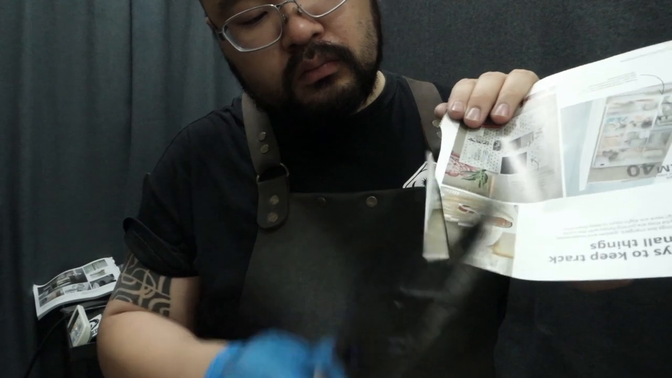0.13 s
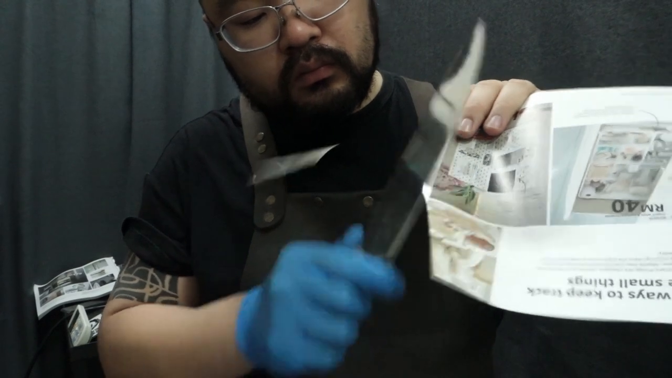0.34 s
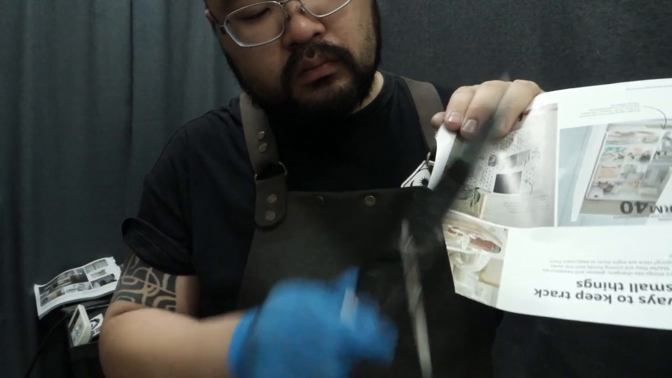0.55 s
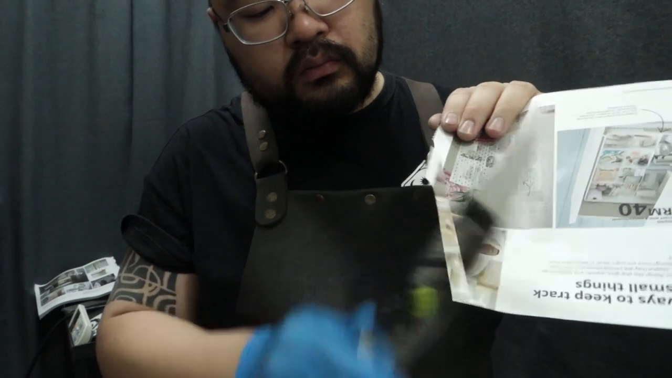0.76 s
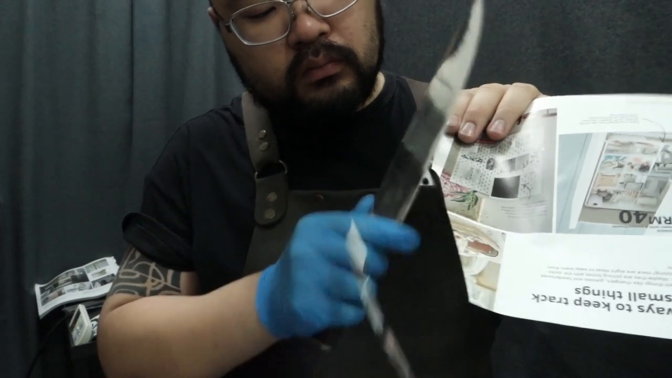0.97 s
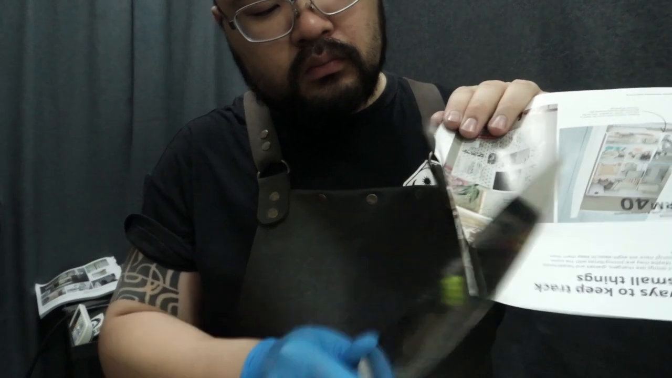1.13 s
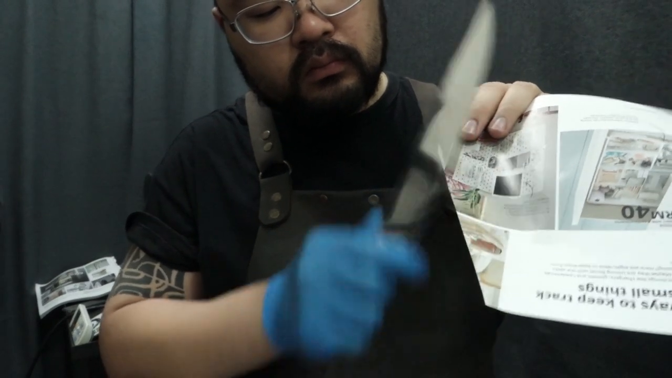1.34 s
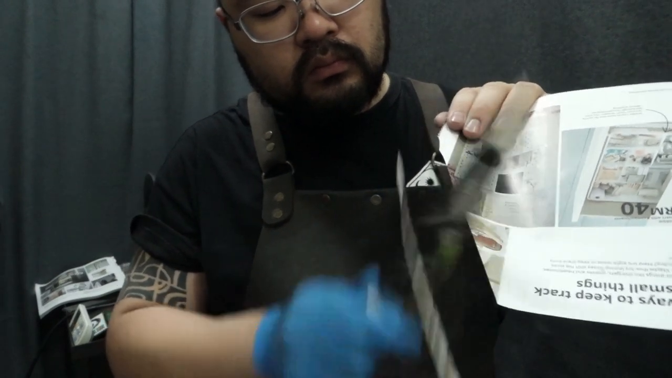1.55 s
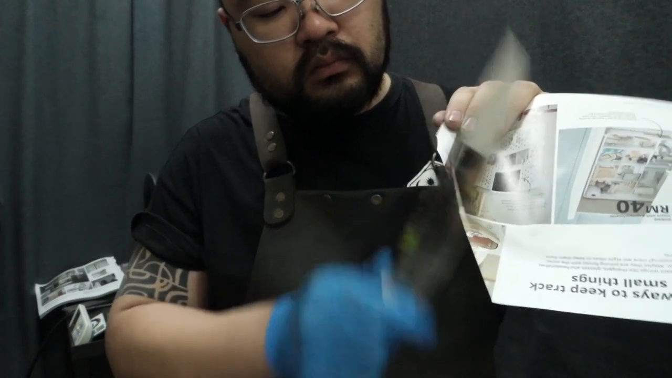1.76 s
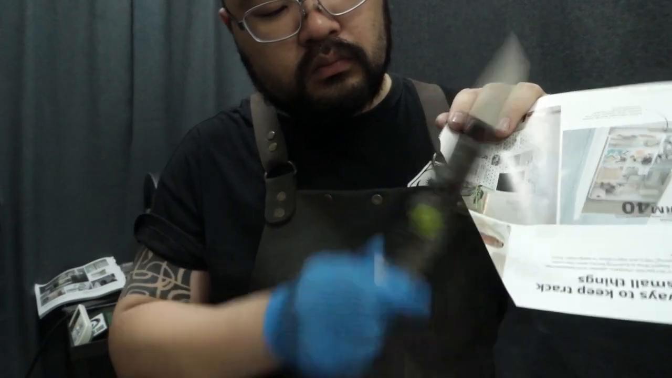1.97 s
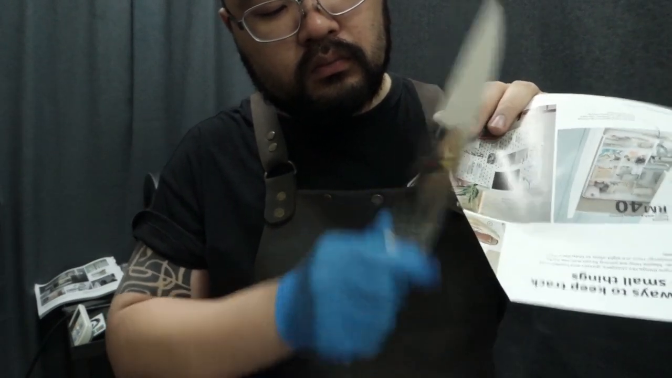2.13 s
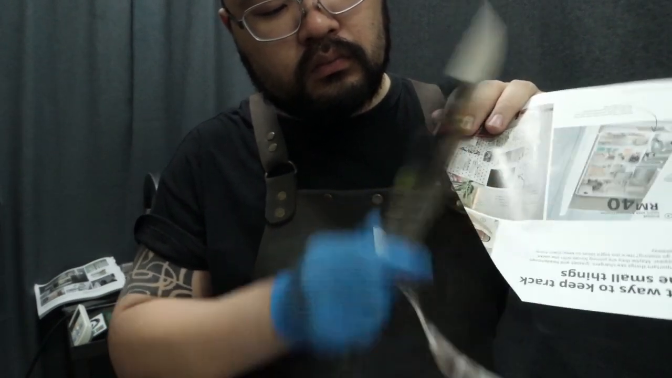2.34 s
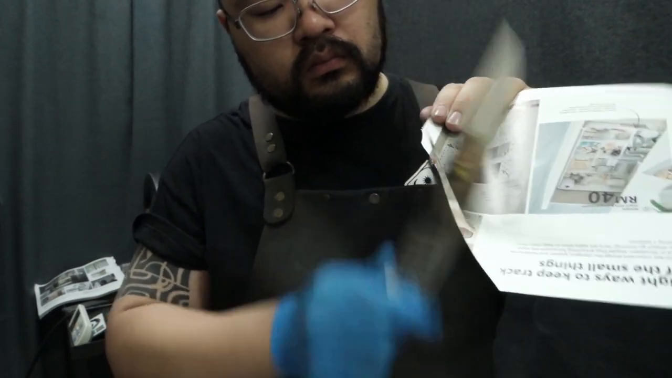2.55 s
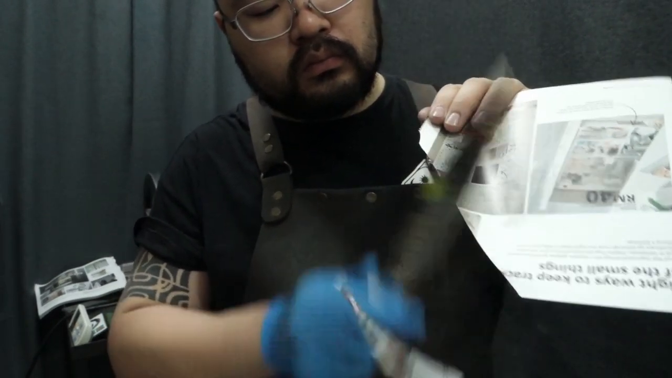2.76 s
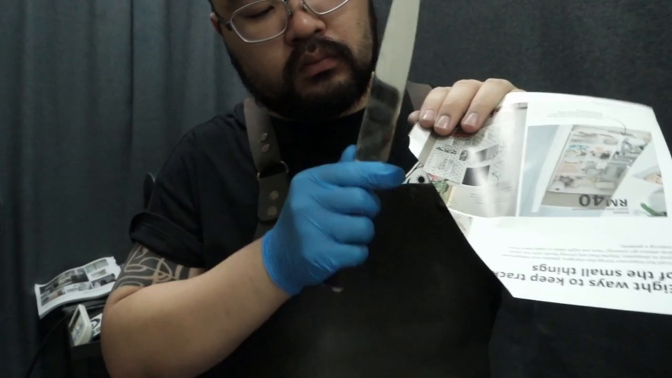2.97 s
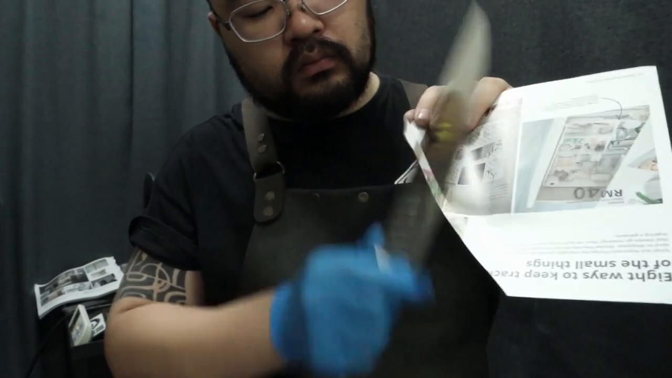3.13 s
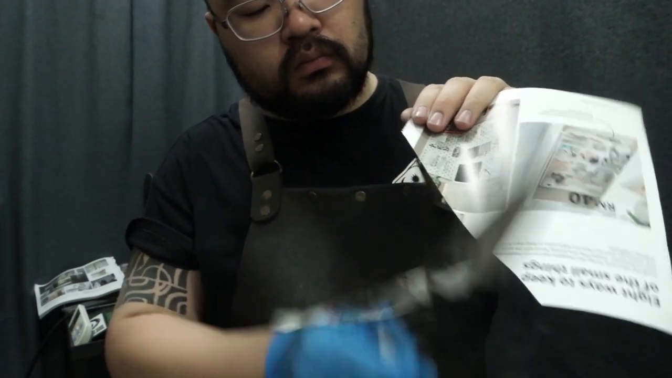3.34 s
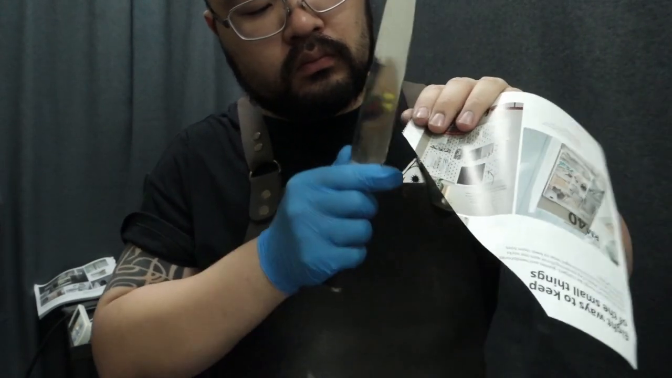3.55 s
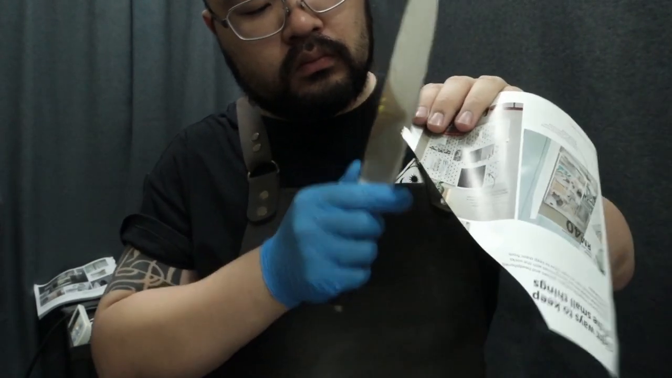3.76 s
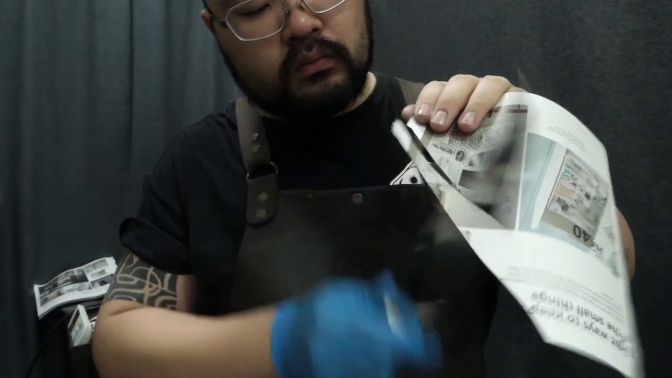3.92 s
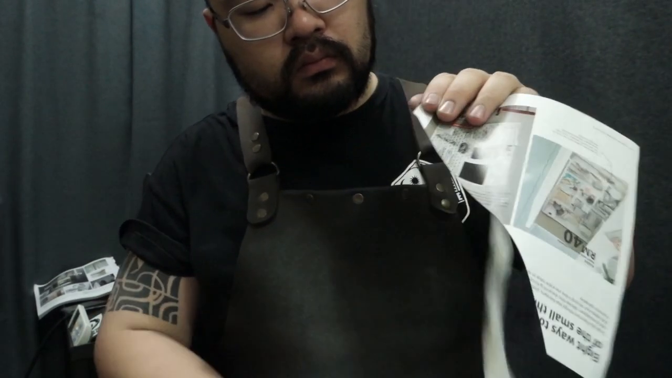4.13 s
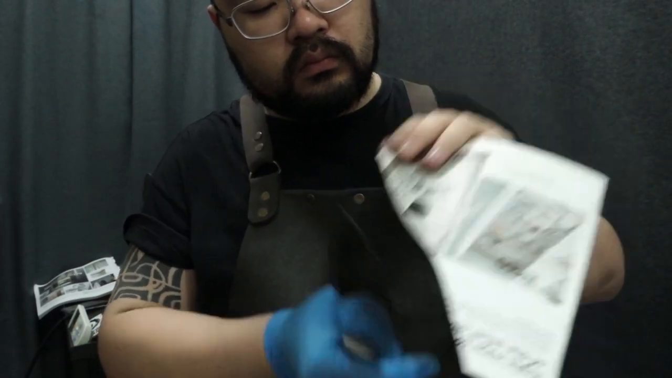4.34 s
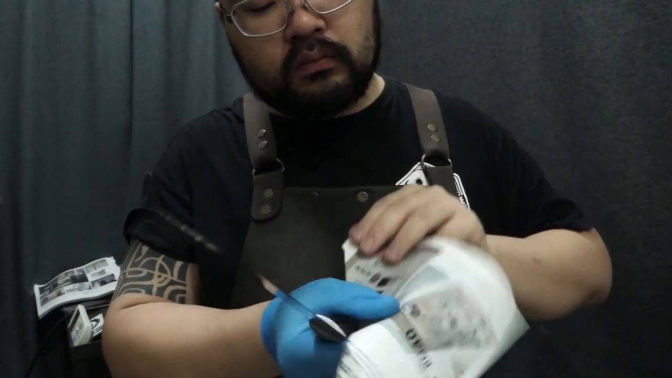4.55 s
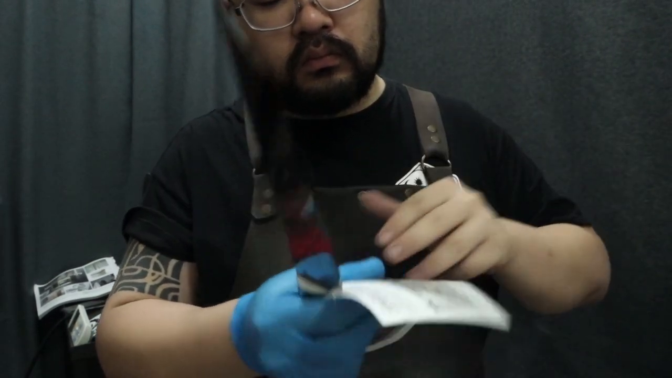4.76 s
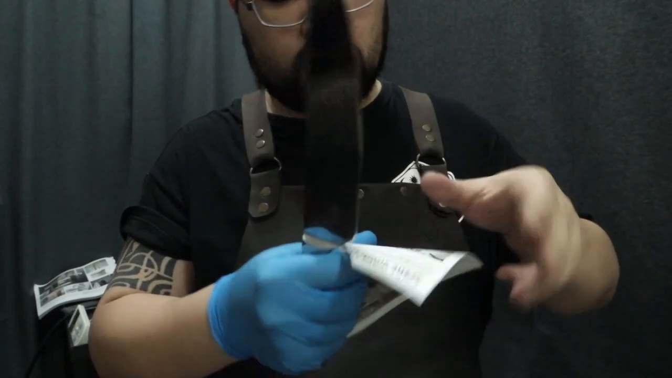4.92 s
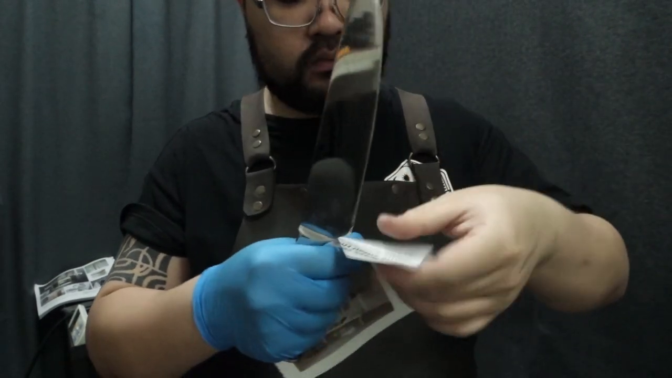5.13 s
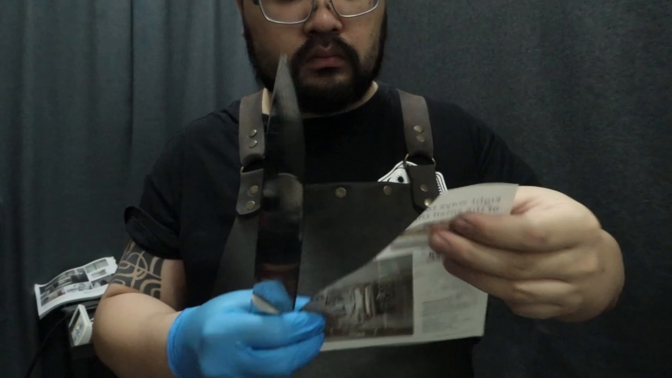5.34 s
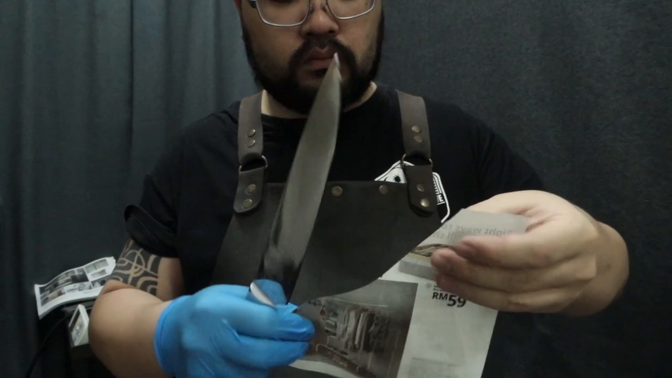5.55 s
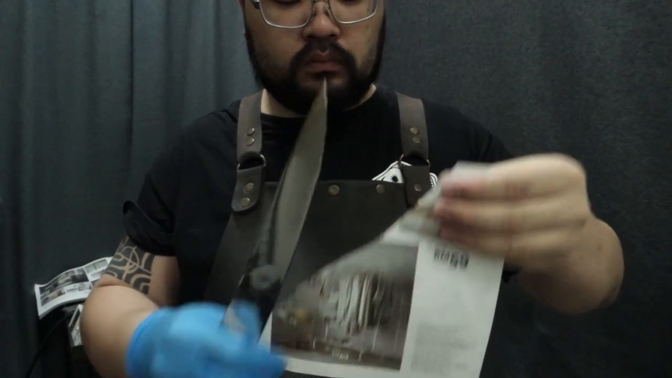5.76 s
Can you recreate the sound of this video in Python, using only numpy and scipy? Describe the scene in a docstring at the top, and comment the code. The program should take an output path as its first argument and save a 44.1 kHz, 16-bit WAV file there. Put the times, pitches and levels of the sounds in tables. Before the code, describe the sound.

A close stereo pickup in a small, fairly dry workshop with a quiet, hollow ventilation rush. A sharp knife slices newsprint off to the right. Eight quick cuts come at about 0.07, 0.38, 0.7, 1.0, 1.4, 1.75, 2.1 and 2.5 seconds, each a crisp zip of roughly a tenth of a second: dense snapping fibres, a papery midrange ring, bright fizz and a gliding rasp. A longer cut follows at 3.06, and the longest, a strong ripping swish of over a quarter second, at 3.75. Small pops of buckling paper occur near some strokes, with a faint rustle around 3.35. From 4.1 the sheet is handled and moves toward the middle: sparse crackles, soft low air puffs, and sharp flapping pops around 4.5 to 4.65 and 4.86. More rustling runs from 5.15 to 5.85, with duller pops near 5.4 and 5.7, then mostly room air.

```python
"""Ten quick slices of a sharp knife through newsprint are heard first, off to the right in a small workshop.
Each is a dense train of snapping fibres, shaped by the resonance of the sheet, with a rasp that may glide in pitch.
The sheet rustles (slipping creases) and pops (dispersive buckling), mostly as the hands turn it after the cuts.
Behind it lie soft puffs of air, diffuse echoes, and the low rush of ventilation made from filtered noise.
"""
import sys
import numpy as np
from scipy import signal
from scipy.fft import rfft, irfft
from scipy.io import wavfile
from scipy.ndimage import uniform_filter1d

SR = 44100
rng = np.random.default_rng(int(sys.argv[2]) if len(sys.argv) > 2 else 0)


def generate_wav(sig):
    """Save sig (samples, or channels by samples) to the path in sys.argv[1] as 16-bit PCM at SR."""
    pcm = np.round(np.clip(np.atleast_2d(sig).T, -1, 1) * 32767).astype(np.int16)
    wavfile.write(sys.argv[1], SR, pcm)


N = 259749
TIME = np.arange(N) / SR  # s

# Knife strokes; levels precede the trims in cuts(). Columns: [start t/s, end t/s, crest/share of stroke,
#   swell up to crest/dB, easing after it/dB, sheet level/dB, fizz over sheet/dB, flutter over sheet/dB,
#   sheet ring f/Hz, first belly rasp f/Hz, last belly rasp f/Hz, tip rasp level/dB]
STROKES = [(0.068, 0.151, 0.52, 12, 3, -28, -0.5, -9, 2200, 8600, 8800, -37),
           (0.381, 0.474, 0.68, 7, 4.5, -26.5, 0, -9.5, 2010, 4330, 5560, -38),
           (0.694, 0.817, 0.42, 4.5, 4.5, -28.5, 0.5, -7, 2050, 8200, 9800, -44),
           (1.023, 1.146, 0.41, 9, 3.5, -29, 1.5, -7.5, 2130, 8700, 7150, -49),
           (1.364, 1.49, 0.73, 1.5, 5, -30, 2, -7.5, 2100, 9500, 4300, -54),
           (1.745, 1.853, 0.51, 3, 1, -30.5, 2, -7, 2400, 7400, 4230, -62),
           (2.124, 2.245, 0.32, 6.5, 2.5, -31.5, 3.5, -6.5, 2320, 7460, 4400, -34.5),
           (2.52, 2.648, 0.4, 3.5, 3.5, -31.5, 5, -7, 2320, 8300, 5800, -30.5),
           (3.057, 3.236, 0.38, 5.5, 9, -27.5, 2, -11, 2260, 6900, 6900, -28.5),
           (3.748, 4.015, 0.47, 9, 4, -24, -1, -12, 2600, 5600, 6700, -28)]
# Bends of the sheet in the hands; levels precede the trims in rustles().
# Columns: [start t/s, length t/s, sheet level/dB, fizz over sheet/dB, ring f/Hz]
BENDS = [(3.333, 0.11, -57, 9, 2200), (4.095, 0.16, -57, 5, 2600), (4.255, 0.065, -47, 12.5, 2600),
         (4.318, 0.18, -58, 2, 2600), (4.495, 0.2, -44, -4.5, 2490), (4.664, 0.079, -44, -7.5, 2580),
         (4.726, 0.17, -50, -3.5, 2450), (4.865, 0.064, -40, -20, 2420), (5.146, 0.091, -37, -9.5, 2030),
         (5.225, 0.14, -46, -6.5, 1970), (5.355, 0.11, -45.5, -7, 2180), (5.476, 0.3, -54, -5.5, 2100),
         (5.627, 0.097, -55, -5.5, 2000), (5.712, 0.15, -46.5, -4, 1910)]
# Buckles of the sheet; levels precede the trims in pops().
# Columns: [t/s, peak level/dB, treble over it/dB, ring f/Hz]
BUCKLES = [(.688, -25.5, -13, 2280), (.912, -45.5, 15, 2400), (2.513, -31, -1, 2300),
           (3.052, -19, -6, 2220), (3.339, -36, 9.5, 2070), (3.397, -32.5, 1.5, 2280),
           (4.158, -34, -9, 2770), (4.258, -26.5, 7, 1490), (4.515, -20.5, -5, 2270),
           (4.549, -16, -11, 2280), (4.646, -21.5, -6.5, 2700), (4.859, -15.5, -2, 2300),
           (5.412, -20.5, -15, 2100), (5.449, -27.5, -20, 2030), (5.718, -27.5, -14, 1500)]
# Flaps of the whole sheet that push air at the microphone. Columns: [t/s, level/dB]
AIR_PUFFS = [(4.255, -63), (4.5, -71), (4.635, -67)]
# Relative spectrum of snapping fibres. Columns: [f/Hz, level/dB]
CUT_SPECTRUM = [(180, -36), (300, -32.5), (406, -23.5), (657, -20.5), (875, -19.5), (1200, -10.5),
                (1530, -8), (2130, 1), (2790, 1.5), (3290, -4), (4130, -8), (5580, -0.5), (8020, -4.5),
                (10200, -6.5), (11000, -5), (14300, -77), (22000, -120)]
# Relative spectrum of slipping creases. Columns: [f/Hz, level/dB]
CREASE_SPECTRUM = [(290, -58), (500, -15), (665, -8.5), (1100, -10), (2490, -12), (4170, -18), (6230, -12),
                   (9920, -11.5), (11000, -12.5), (14300, -51), (22000, -120)]
# Relative spectrum of the ventilation. Columns: [f/Hz, level/dB]
AIR_SPECTRUM = [(15, -75.5), (25, -72), (110, -28), (247, -9.5), (603, -3.5), (721, -6.5), (862, -5.5),
                (1330, -9), (1510, -12.5), (1670, -8.5), (2000, -10.5), (2160, -8), (2450, -12),
                (3000, -23.5), (11000, -26), (14300, -76), (22000, -120)]
# Paper fully to the side, at the two microphone ports. Columns: [f/Hz, left minus right level/dB]
PAPER_BALANCE = [(500, -3), (1500, -4.5), (2700, -2.5), (3300, -7), (4300, -12), (5500, -6), (7500, -11),
                 (11000, -8.5)]
# Phase of the same. Columns: [f/Hz, lead of left port/rad]
PAPER_PHASE = [(100, 0), (2000, -0.2), (3000, -0.8), (4100, -2.3), (4300, 2.5), (4800, 0.5), (6000, -0.8),
               (11000, -1.9)]
# Sound from all round at the ports. Columns: [f/Hz, left minus right level/dB]
ROOM_BALANCE = [(600, 0.5), (2300, 0), (3300, -6), (4400, -9), (5500, -4), (11000, -6)]
# Reverberation time of the workshop. Columns: [f/Hz, t60/s]
ROOM_DECAY = [(300, 0.72), (1200, 0.24), (2500, 0.27), (5500, 0.29), (11000, 0.24)]

# every stroke swells to a crest and eases off; the fizz eases less than the sheet
SWELL_CURVE, STROKE_RAMP_S, FIZZ_EASE_SHARE = 1.38, 0.0029, 0.45
# the sheet falls quiet over this time once the edge has left it or the hand has stopped
RELEASE_S = 0.013
# the loose strip flutters most a little past the middle of the stroke
FLUTTER_CREST, FLUTTER_EASE_DB = 0.59, 8
# the belly of the blade rasps in the first half of the stroke, the tip near its end: (from, to) shares
BELLY_SHARES, BELLY_OVER_FIZZ_DB = (0.092, 0.508), -6  # dB over the tabulated fizz
TIP_SHARES, TIP_FIRST_HZ, TIP_LAST_HZ = (0.75, 0.93), 10940, 8800
# a move of the sheet builds quickly and dies away
RUSTLE_CREST, RUSTLE_SWELL_DB, RUSTLE_EASE_DB, RUSTLE_RAMP_S = 0.29, 2.5, 9, 0.0035
# after the last cut the hands bring the sheet towards the middle
TURN_START_S, TURN_LENGTH_S = 4.33, 0.13
AIR_DB = -52.5  # rush, before it is made diffuse
EDGE_HZ = 11080  # upper band limit


def cuts(sheet_db=0.5, fizz_db=-2.0, flutter_db=0.0, bite_db=-34, bite_s=0.00094):
    """Impulsive fracture: snapping fibres fizz at the edge, ring in the sheet and shake the loose strip."""
    out = np.zeros(N)
    clicks = snaps(N, per_s=6000, spread_db=1.7, clump_db=0.96, clumps_per_s=250)
    fibres = colour(patchy(clicks), CUT_SPECTRUM)
    for start, end, crest, swell_db, ease_db, db, over_db, strip_db, ring_hz, *_ in STROKES:
        tear = fibres[round(start * SR):round((end + RELEASE_S / 2) * SR)]
        n = len(tear)
        sheet_swell = swell(n, crest, swell_db, ease_db, STROKE_RAMP_S)
        fizz_swell = swell(n, crest, swell_db, FIZZ_EASE_SHARE * ease_db, STROKE_RAMP_S)
        flutter_swell = swell(n, FLUTTER_CREST, swell_db, FLUTTER_EASE_DB, STROKE_RAMP_S)
        # the edge bites into the rim of the sheet with a burst of fizz
        bite = from_db(bite_db) * np.exp(-TIME[:n] / bite_s)
        fizz_gain = from_db(db + over_db + fizz_db) * fizz_swell + bite

        sheet = from_db(db + sheet_db) * sheet_swell * sheet_body(tear, ring_hz, lo_hz=1470, width_hz=1280)
        fizz = fizz_gain * unit(band(tear, 3240, 11500))
        flutter = from_db(db + strip_db + flutter_db) * flutter_swell * unit(band(tear, 317, 1420))
        add(out, start, sheet + fizz + flutter)
    return out


def rasps():
    """Resonant noise, twice a stroke: a rasp along the belly of the blade, then one at the tip."""
    out = np.zeros(N)
    for start, end, _, _, _, db, over_db, _, _, first_hz, last_hz, tip_db in STROKES:
        belly_db = db + over_db + BELLY_OVER_FIZZ_DB
        add(out, *rasp(start, end, BELLY_SHARES, first_hz, last_hz, belly_db))
        add(out, *rasp(start, end, TIP_SHARES, TIP_FIRST_HZ, TIP_LAST_HZ, tip_db))
    return out


def rasp(start, end, shares, first_hz, last_hz, db, width_hz=1500, fade_share=0.3):
    """Resonant noise: randomly timed, clumped fibre snaps ring round one pitch, which may glide."""
    begin, stop = start + (end - start) * np.array(shares)
    length = max(round((stop - begin) * SR), 64)
    hz = np.geomspace(first_hz, last_hz, length)
    drive = snaps(length, per_s=7000, spread_db=1.5, clump_db=2, clumps_per_s=300)
    tone = unit(resonate(resonate(drive, hz, width_hz), hz, width_hz))
    return begin, from_db(db) * tone * signal.windows.tukey(length, fade_share)


def rustles(sheet_db=-3, fizz_db=-3):
    """Stick-slip: creases slip as the sheet bends, giving sparser and duller clicks than a cut."""
    out = np.zeros(N)
    clicks = snaps(N, per_s=1500, spread_db=2.5, clump_db=3.5, clumps_per_s=170)
    creases = colour(patchy(clicks), CREASE_SPECTRUM)
    for start, length, db, over_db, ring_hz in BENDS:
        crackle = creases[round(start * SR):][:round(length * SR)]
        sheet = from_db(sheet_db) * sheet_body(crackle, ring_hz, lo_hz=590, width_hz=1970)
        fizz = from_db(fizz_db + over_db) * unit(band(crackle, 4900, 11400))
        move = swell(len(crackle), RUSTLE_CREST, RUSTLE_SWELL_DB, RUSTLE_EASE_DB, RUSTLE_RAMP_S)
        add(out, start, from_db(db) * (sheet + fizz) * move)
    return out


def pops(ring_width_hz=1400, fall_s=0.0018, crackle=0.19, level_db=-2.0, tick_db=-2.0, thud_db=-16):
    """Snap-through buckling: one snap with a dense, quickly dying crackle runs across the sheet and rings it."""
    out, t = np.zeros(N), np.arange(1024) / SR
    for s, db, treble_db, hz in BUCKLES:
        dying_crackle = crackle * rng.standard_normal(len(t)) * np.exp(-t / fall_s)
        flip = bend_wave((t == 0) + dying_crackle, travel_s=0.00204)
        ring = resonate(band(flip, 1070, 2940, order=4), hz, ring_width_hz)
        tick = band(flip, 4150, 8800, order=2)
        thud = band(flip, 320, 1570, order=2)
        parts = [(ring, 0), (tick, treble_db + tick_db), (thud, thud_db)]
        pop = sum(from_db(part_db) * x / abs(x).max() for x, part_db in parts)
        add(out, s, from_db(db + level_db) * pop)
    return out


def snaps(length, per_s, spread_db, clump_db, clumps_per_s):
    """A random point process: fibres give way one by one, in clicks of uneven size that come in clumps."""
    size = from_db(spread_db * np.minimum(rng.exponential(1, length), 4))
    clicks = size * rng.choice([-1, 1], length) * (rng.random(length) < per_s / SR)
    return unit(clicks * from_db(clump_db * wander(length, clumps_per_s)))


def sheet_body(x, ring_hz, lo_hz, width_hz):
    """Plate resonance: a broad ring whose pitch depends on how the sheet is held and curved."""
    return unit(resonate(band(x, lo_hz, 4095), ring_hz, width_hz))


def patchy(x, depth_db=2.5, order=3, size=16):
    """Shifting spectrum: the flexing sheet favours now this band, now that, for some tens of milliseconds."""
    z = signal.stft(x, SR, nperseg=256, noverlap=192)[2]
    # smoothed over frequency, then over time
    patches = uniform_filter1d(rng.standard_normal(z.shape), order, 0)
    patches = uniform_filter1d(patches, size, 1)
    return signal.istft(z * from_db(depth_db * unit(patches)), SR, nperseg=256, noverlap=192)[1][:N]


def bend_wave(x, travel_s):
    """Dispersion: the treble of a bending wave in paper arrives first, 1 kHz after travel_s."""
    khz = np.fft.rfftfreq(len(x), 1 / SR) / 1000
    lag = 4 * np.pi * 1000 * travel_s * np.sqrt(khz)  # rad; the delay falls as 1/sqrt(f)
    return irfft(rfft(x) * np.exp(-1j * lag), len(x))


def swell(length, crest, swell_db, ease_db, ramp_s):
    """Envelope of one hand movement: it starts at once, swells to a crest, eases off, and lets go."""
    u, crest = np.linspace(0, 1, length), np.clip(crest, .01, .99)
    rise_db = -swell_db * np.maximum(1 - u / crest, 0) ** SWELL_CURVE
    fall_db = -ease_db * np.maximum(u - crest, 0) / (1 - crest)
    t = TIME[:length]
    return from_db(rise_db + fall_db) * np.minimum(t / ramp_s, 1) * np.minimum(t[::-1] / RELEASE_S, 1)


def flaps(rise_s=0.0051, top_hz=110):
    """Unsteady airflow: each flap is a soft puff of low noise, different at each port."""
    out, t = np.zeros((2, N)), TIME[:4096]
    for s, db in AIR_PUFFS:
        for port in out:
            puff = unit(band(rng.standard_normal(len(t)), 17, top_hz, order=2))
            add(port, s, from_db(db) * puff * t / rise_s * np.exp(1 - t / rise_s))
    return out


def ports(x, offside=1):
    """Level and phase differences: paper off to the right is shaded and shifted in phase at the left port."""
    hz = np.fft.rfftfreq(N, 1 / SR)
    left = from_db(offside * lookup(PAPER_BALANCE, hz)) * np.exp(1j * offside * lookup(PAPER_PHASE, hz))
    pair = np.array([left, np.ones(len(hz))])
    # the sum of both ports keeps the spectrum of the paper
    return irfft(rfft(x) * pair * 2 / abs(1 + left), N)


def workshop(x, turns_per_s=1.3):
    """Time-varying reverberation: the paper keeps moving, so its pattern of echoes keeps changing."""
    angle = 2 * np.pi * turns_per_s * TIME
    shares = (np.cos(angle), np.sin(angle))  # two echo patterns take turns
    return sum(signal.fftconvolve((x * share)[None], echoes(), axes=1)[:, :N] for share in shares)


def echoes(first_s=0.0036, build_s=0.014, size=26000):
    """Exponential decay: close surfaces answer early and evenly, then each band dies at its own speed."""
    taps = rng.standard_normal((2, size)) * (rng.random((2, size)) < 5000 / SR)
    hz, t, z = signal.stft(taps, SR, nperseg=256)
    z = z * from_db(-60 * np.maximum(t - build_s, 0) / lookup(ROOM_DECAY, hz)[:, None])
    decaying = signal.istft(z, SR, nperseg=256)[1][:, :size]
    tail = diffuse(decaying * (TIME[:size] > first_s))
    return tail / np.sqrt((tail ** 2).sum() / 2)


def diffuse(pair, unlike_hz=4600, likeness=0.92):
    """Diffuse-field coherence: sound from all round is alike at both ports in the bass, not in the treble."""
    hz, (a, b) = np.fft.rfftfreq(pair.shape[1], 1 / SR), rfft(pair)
    same = np.clip(likeness * np.sinc(hz / unlike_hz), -1, 1)
    lean = from_db(lookup(ROOM_BALANCE, hz) / 2)
    left = (same * a + np.sqrt(1 - same ** 2) * b) * lean
    return irfft([left, a / lean], pair.shape[1])


def air(waver_db=0.58, rumble_db=-91, duct_hz=680, duct_width_hz=90, duct_db=-63):
    """Flow noise: a slightly wavering ventilation rush, one hollow resonance, and a faint rumble."""
    gain = from_db(lookup(AIR_SPECTRUM, np.fft.rfftfreq(N, 1 / SR)))
    rush = irfft(rfft(rng.standard_normal((2, N))) * gain, N)
    duct = np.array([resonate(resonate(n, duct_hz, duct_width_hz), duct_hz, duct_width_hz) for n in rush])
    rumble = unit(band(rng.standard_normal((2, N)), 16, 130, order=1))
    steady = from_db(AIR_DB) * unit(rush) + from_db(duct_db) * unit(duct)
    return diffuse(steady) * from_db(waver_db * wander(N, 7.3)) + from_db(rumble_db) * rumble


def from_db(db):
    """Level definition: decibels to amplitude gain."""
    return 10 ** (np.asarray(db) / 20)


def unit(x):
    """Normalisation: scales to rms 1."""
    return x / np.sqrt(np.mean(x ** 2) + 1e-20)


def lookup(points, hz):
    """Interpolation: reads a table along log frequency."""
    f, value = np.transpose(points)
    return np.interp(np.log(hz + 1), np.log(f + 1), value)


def add(mix, s, sound):
    """Superposition: mixes a sound in at time s."""
    part = mix[max(round(s * SR), 0):][:len(sound)]
    part += sound[:len(part)]


def band(x, lo_hz, hi_hz, order=3):
    """Causal band-pass filtering."""
    sos = signal.butter(order, [lo_hz, min(hi_hz, SR / 2 - 1)], "band", fs=SR, output="sos")
    return signal.sosfilt(sos, x)


def colour(x, points, size=2048):
    """Minimum-phase filtering: imposes the given spectrum causally, so that clicks stay sharp."""
    log_gain = np.log(from_db(lookup(points, abs(np.fft.fftfreq(size, 1 / SR)))) + 1e-5)
    taps = np.fft.ifft(np.exp(np.conj(signal.hilbert(log_gain)))).real
    return signal.oaconvolve(x, taps[:size // 2])[:len(x)]


def resonate(x, hz, width):
    """Damped resonance of the given width in Hz, whose centre follows the curve hz."""
    turn = np.exp(2j * np.pi * np.cumsum(hz * np.ones(len(x))) / SR)
    r = np.exp(-np.pi * width / SR)
    # shift the centre to 0 Hz, smooth, shift back
    return 2 * (turn * signal.lfilter([1 - r], [1, -r], x / turn)).real


def wander(length, per_s):
    """Random modulation of rms 1, linear between random knots."""
    knots = rng.standard_normal(4096)
    return unit(np.interp(np.arange(length) * per_s / SR % 4095, np.arange(4096), knots))


def scene(side_room_db=-3.0, middle_room_db=-0.5):
    """Direct plus reverberant sound: cuts to one side, then the sheet nearer the middle excites the room more."""
    paper = cuts() + rasps() + rustles() + pops()
    turned = np.clip((TIME - TURN_START_S) / TURN_LENGTH_S, 0, 1)
    side, middle = paper * (1 - turned), paper * turned
    room = workshop(from_db(side_room_db) * side + from_db(middle_room_db) * middle)
    return ports(side) + ports(middle, offside=0.47) + room + flaps() + air()


def record(dry, low_cut_hz=70):
    """Band limitation: a gentle low cut and a steep upper limit."""
    dry = signal.sosfilt(signal.butter(2, low_cut_hz, "high", fs=SR, output="sos"), dry)
    taps = signal.firwin(1023, EDGE_HZ, window=("kaiser", 8), fs=SR)
    return signal.oaconvolve(dry, taps[None], "same", axes=1)


dry = scene()
out = record(dry)
generate_wav(out)
```